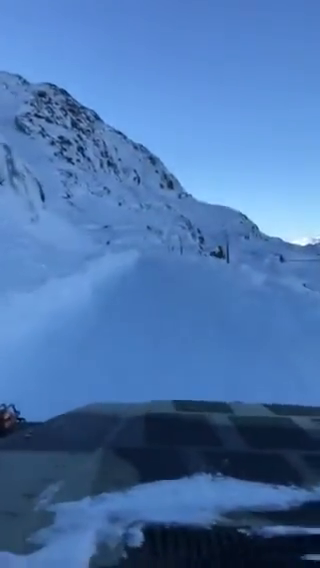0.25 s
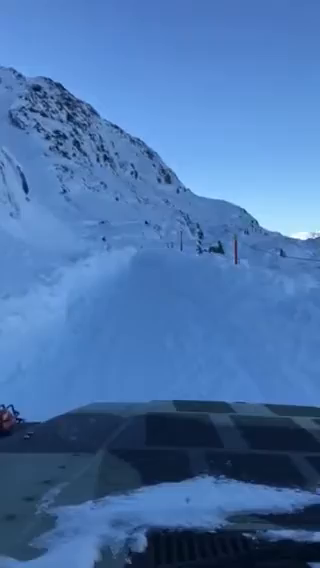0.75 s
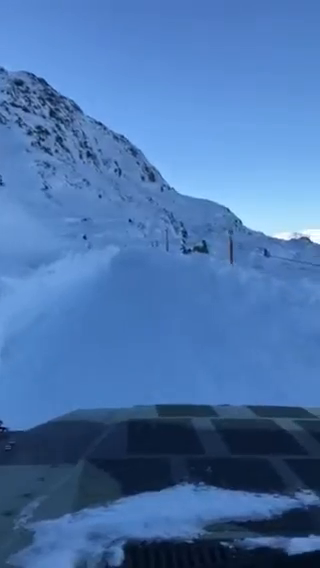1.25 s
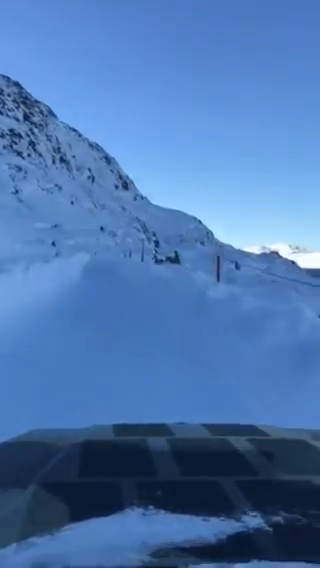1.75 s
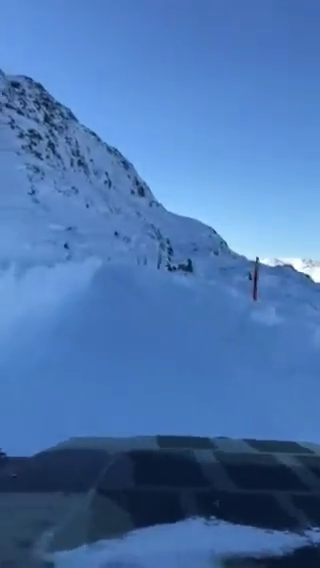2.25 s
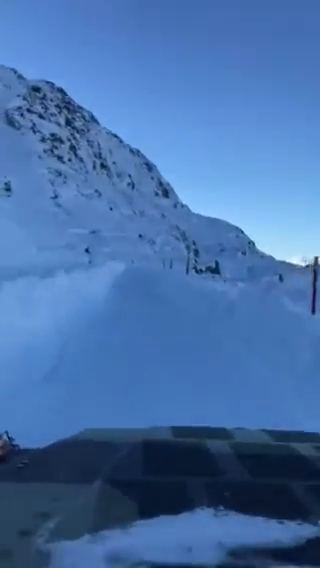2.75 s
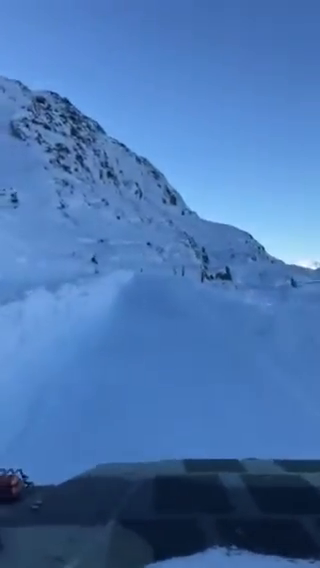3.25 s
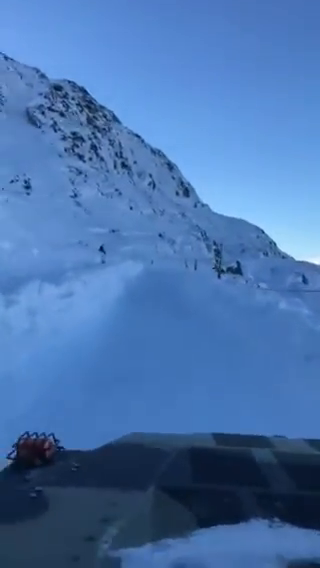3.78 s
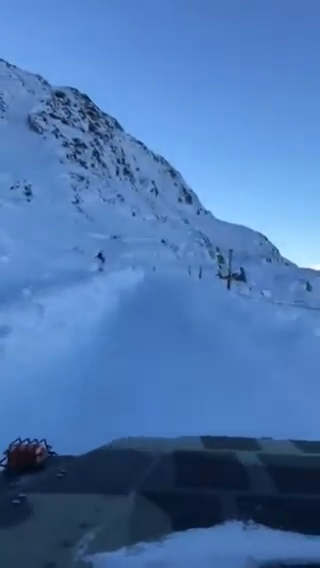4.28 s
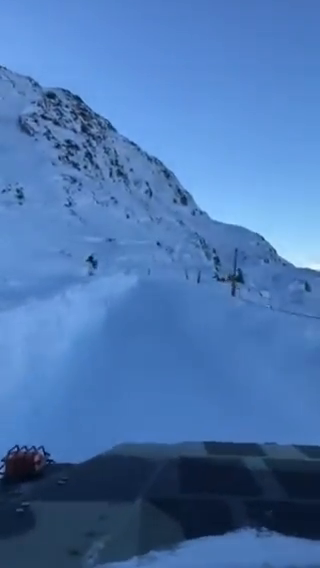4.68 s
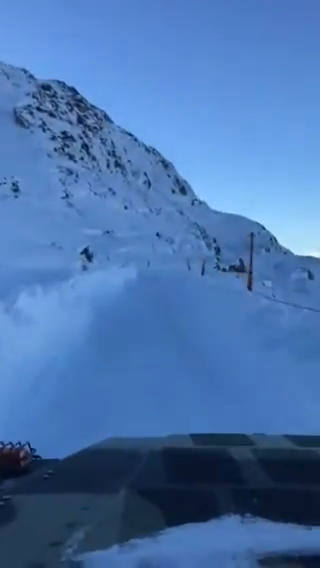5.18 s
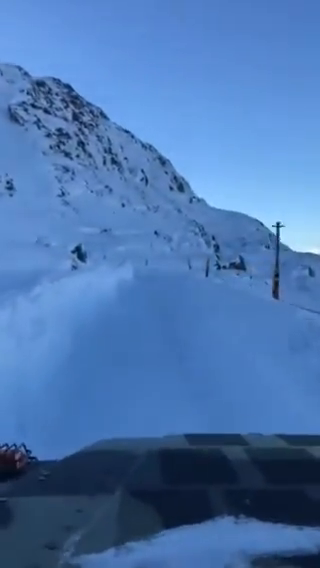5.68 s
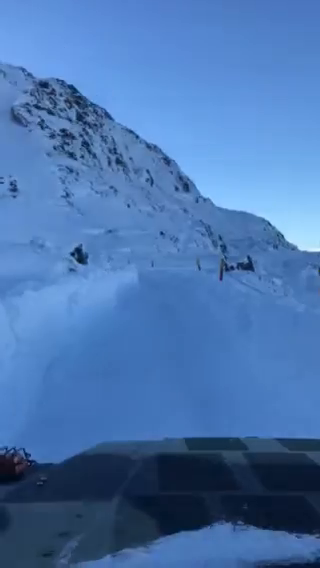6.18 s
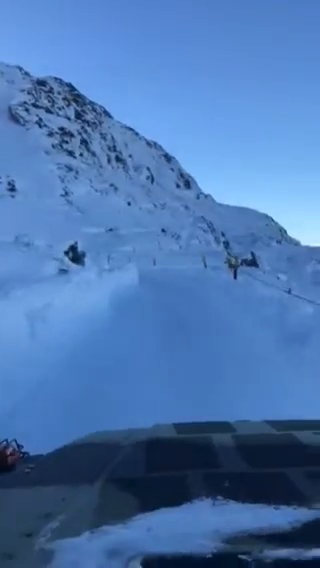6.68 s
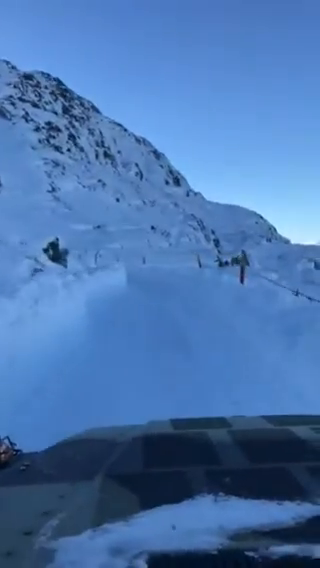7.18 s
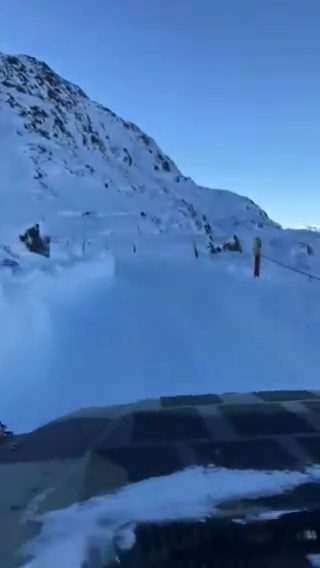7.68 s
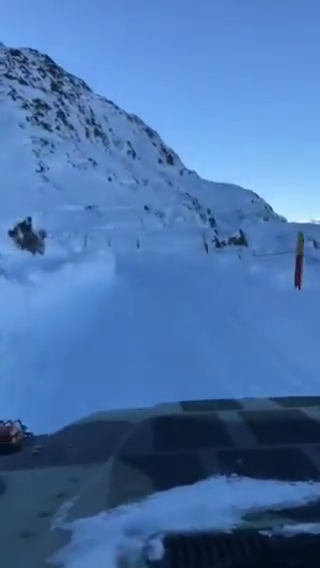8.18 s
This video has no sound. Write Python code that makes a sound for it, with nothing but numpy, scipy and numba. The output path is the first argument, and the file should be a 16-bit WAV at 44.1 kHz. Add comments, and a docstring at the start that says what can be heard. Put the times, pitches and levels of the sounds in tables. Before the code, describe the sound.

Inside a heavy vehicle cab, a deep uneven engine boom and floor thumps roll over crunching snow, with loose metal rattling and brief squeaks.

```python
"""Inside the cab of a heavy vehicle crawling over deep snow on chained wheels, for some eight seconds.
Throughout, uneven firings and bumps resonate as boom, floor modes drum, and snow noise crunches and hisses.
A bracket squeaks in stick-slip harmonics at once; modal clatter is densest up to about 3 s, with two-mode clinks.
Near 2.3 s it squeaks again and a sliding tone squeals; sparser knocks follow, with one more squeak at 4.5 s.
Three squeals fall around 8 to 8.2 s; the boom swells strongest near 8.3 s, dips and briefly returns."""
import sys
import numpy as np
from scipy import signal
from scipy.fft import rfft, irfft
from scipy.io import wavfile
from scipy.ndimage import uniform_filter1d
from numba import njit

SR = 44100
rng = np.random.default_rng(int(sys.argv[2]) if len(sys.argv) > 2 else 0)


def inscribe(sig):
    """Save sig as 16-bit PCM at rate SR to the path in sys.argv[1].

    A 1-D sig is mono; a 2-D sig holds one channel per row.
    Samples are clipped to [-1, 1] before scaling.
    """
    pcm = np.round(np.clip(np.atleast_2d(sig).T, -1, 1) * 32767)
    wavfile.write(sys.argv[1], SR, pcm.astype(np.int16))


N = 371763

# boom of the cab air, before its random waver: start_s, level_db
BOOM_LEVEL = [(0.0, -26), (0.09, -14), (0.19, -34), (0.23, -18.5), (0.63, -22), (0.98, -18.5), (1.08, -50),
              (1.15, -19), (1.36, -17), (1.38, -20), (1.48, -17), (1.95, -14.5), (2.02, -27), (2.04, -45),
              (2.09, -21.5), (2.37, -16.5), (2.46, -25), (2.63, -18.5), (2.67, -34), (2.82, -14.5),
              (2.96, -36), (2.98, -16.5), (3.12, -16), (3.15, -32), (3.4, -21), (3.43, -19), (3.57, -16),
              (3.59, -45), (3.85, -13), (4.01, -26), (4.06, -21), (4.15, -27), (4.51, -26), (4.58, -15.5),
              (4.65, -20.5), (5.56, -19), (5.61, -28), (5.8, -30), (5.99, -12.5), (6.03, -30), (6.1, -24),
              (6.13, -25.5), (6.32, -20.5), (6.62, -16), (6.69, -27), (6.78, -15), (6.86, -35),
              (6.9, -17.5), (7.16, -21), (7.21, -40), (7.25, -18), (7.58, -19.5), (7.65, -36),
              (7.82, -15.5), (7.96, -23), (8.1, -12.5), (8.17, -38), (8.29, -9.5), (8.36, -27),
              (8.43, -14.5)]
# centre of the cab resonance and mean firing rate: start_s, pitch_hz
BOOM_TUNING = [(0.0, 49.02), (0.98, 48.4), (1.2, 55.88), (1.55, 46.62), (1.76, 55.7), (2.02, 47.05),
               (2.32, 45.74), (2.44, 57.35), (2.89, 60.1), (3.59, 50.68), (4.84, 47.26), (5.35, 50),
               (6.55, 46.77), (6.9, 55.44), (7.18, 48.82), (8.43, 47.4)]
BOOM_WAVER_DB = -0.1  # rms of the slight random swell
# steady low shaking of the frame: frequency_hz, density_db (per Hz)
SWAY_SHAPE = [(16, -0.5), (25, -13.5), (33, -4), (40, 2.5), (70, 0.5)]
SWAY_DB = -25
# wheel bumps: start_s, floor_peak_db, body_rms_db
WHEEL_BUMPS = [(0.252, -18, -30), (0.463, -20, -30), (0.815, -14, -29), (0.909, -19.5, -57),
               (1.099, -38, -29), (1.431, -11.5, -26), (1.625, -14.5, -30.5), (1.897, -23, -24.5),
               (2.372, -30, -32), (2.573, -28, -38), (2.777, -26, -25), (3.04, -17, -28.5),
               (3.35, -10, -46), (3.637, -18, -37), (3.829, -36, -30), (3.912, -14.5, -55),
               (4.235, -16.5, -30.5), (4.421, -8.5, -54), (4.781, -14.5, -47), (5.068, -9.5, -31),
               (5.2, -12.5, -28.5), (5.349, -22, -49), (5.601, -15.5, -50), (6.036, -14.5, -35),
               (6.255, -31, -28.5), (6.809, -39, -28.5), (6.913, -35, -41), (7.07, -12, -36),
               (7.527, -11.5, -35), (7.831, -24, -49), (7.997, -32, -30.5), (8.37, -12, -36)]
THUMP_RISE_S, THUMP_T60_S = 0.008, 0.7
# resonances of the floor panels: frequency_hz, width_hz, weight_db
PANEL_MODES = [(90.4, 30, -0.5), (107.6, 31, 2), (130.9, 25.8, -3)]
DRUM_DB, DRUM_PER_CRUNCH_DB = -27.5, 0.84  # level at the usual crunch; dB gained per dB of crunch
# rumble of the body: frequency_hz, density_db (per Hz)
RUMBLE_SHAPE = [(25, 6), (70, -6.5), (140, 2.5), (190, -4), (270, -4.5), (400, -15.5), (600, -19.5),
                (900, -30)]
RUMBLE_DB, RUMBLE_PER_CRUNCH_DB = -32, 0.05  # likewise
# load of snow under the wheels: start_s, crunch_db, hiss_db
SNOW_LOAD = [(0, -47, -52.5), (.37, -43, -45.5), (.65, -45.5, -53.5), (.91, -41, -46.5),
             (1.2, -43.5, -51.5), (1.55, -41.5, -45.5), (1.9, -47, -49.5), (2.6, -43.5, -49.5),
             (2.96, -41, -48.5), (3.22, -49.5, -54), (3.5, -44.5, -48), (3.93, -39.5, -46.5),
             (4.12, -48.5, -54), (4.46, -39, -46), (4.75, -44, -47.5), (5.23, -40, -51), (5.42, -43, -49.5),
             (5.53, -45, -59.5), (5.65, -43, -51.5), (5.75, -48, -59), (5.88, -41.5, -56), (6.06, -42, -49),
             (6.6, -46.5, -53), (6.9, -41, -51), (7.17, -42.5, -50.5), (7.27, -41, -46.5),
             (7.4, -44.5, -55.5), (7.56, -41.5, -48.5), (7.7, -48.5, -53.5), (7.85, -42.5, -48.5),
             (8.1, -42, -48.5), (8.2, -46, -51), (8.43, -42, -47)]
USUAL_CRUNCH_DB = -43
# coarse breaking of snow: frequency_hz, density_db (per Hz)
CRUNCH_SHAPE = [(400, 13.5), (700, -0.5), (1000, 4.5), (1400, 2), (2000, -9.5), (3000, -36), (4500, -29)]
# fine breaking of snow: frequency_hz, density_db (per Hz)
HISS_SHAPE = [(2000, 5), (3300, -1), (4600, -3), (6500, -7.5), (8000, -10), (10400, -13.5), (12000, -13),
              (15500, -15)]
LUMPS_DB, PINGS_DB = -6, -11  # relative to the crunch
# knocks of loose gear, levels before fixed offsets:
# start_s, peak_db, thud_db (re peak), sizzle_db (re peak), strongest_ring_hz, scrape_s
KNOCKS = [(0.072, -35.5, -20, 0, 8800, 0.02), (0.232, -28.5, 4, -8, 3550, 0.012),
          (0.276, -22.5, -1.5, -29, 3660, 0.004), (0.288, -26, -3, -29, 4430, 0.0057),
          (0.305, -18, -18, -10, 7500, 0.0016), (0.341, -37, 10, -25, 2400, 0.006),
          (0.504, -24.5, 2.5, -14, 2380, 0.019), (0.5805, -33, 6, -22, 3280, 0.0035),
          (0.765, -21.5, -10, -26, 4460, 0.0021), (0.993, -46, 16, -23, 2370, 0.0059),
          (1.089, -17.5, -1, -31, 4030, 0.00089), (1.17, -20, -6.5, -11, 4420, 0.02),
          (1.28, -24.5, -25, -30, 6100, 0.0043), (1.459, -22, -1.5, -9, 6300, 0.021),
          (1.566, -13.5, -2, -20, 3300, 0.004), (1.584, -34, 3, -22, 2050, .005),
          (1.6096, -9.5, -11, -11, 5100, 0.0028), (1.611, -26.5, 2, -22, 2170, .008),
          (1.673, -21, -5, -8, 6600, 0.012), (1.727, -11.5, -10, -13, 2320, 0.008),
          (1.739, -21, -9, -9, 3700, 0.01), (1.858, -22.5, 4.5, -19, 2860, 0.011),
          (1.905, -26, 7.5, -27, 2700, 0.0093), (1.98, -41, -15, -25, 4000, .002),
          (1.998, -32, 4, -25, 2500, 0.0071), (2.0018, -16.5, -13, -17, 5300, 0.012),
          (2.022, -24.5, -14, -12, 5600, 0.013), (2.083, -40, 10, -22, 1700, 0.0041),
          (2.223, -43, 16, -20, 2480, 0.0036), (2.2845, -30.5, 5, -29, 3442, 0.012),
          (2.5, -54, 2, -22, 3450, 0.0053), (2.578, -29, -10, -7, 3480, 0.0044),
          (2.729, -29, 1, -8, 3150, 0.0092), (2.7735, -14.5, -7.5, -9, 7040, 0.0079),
          (2.783, -13.5, -12, -8, 3830, 0.011), (2.808, -16, -11, -11, 3880, 0.017),
          (2.829, -27, -8, -12, 4370, 0.0067), (2.863, -20.5, -14, -13, 6400, 0.012),
          (2.875, -21.5, -19, -15, 3160, 0.017), (2.914, -36, 4, -22, 1597, 0.013),
          (2.93, -21, -5, -26, 4270, 0.021), (2.965, -21.5, -2, -27, 4370, 0.011),
          (3.03, -26, 8, -23, 3710, 0.0027), (3.047, -42, 6, -25, 2000, 0.0059),
          (3.0615, -29, -11, -23, 4530, 0.0035), (3.069, -29, 5.5, -20, 3200, 0.0065),
          (3.101, -28, -3, -3, 8520, .003), (3.273, -35, 9, -26, 2936, 0.015),
          (3.332, -30.5, -1, -14, 2550, 0.02), (3.381, -25, -3.5, -9, 2780, 0.0038),
          (3.477, -27, -14, -25, 3160, 0.0043), (3.5813, -25, -27, -8, 4495, 0.018),
          (3.6673, -30.5, 5, -15, 3830, 0.003), (3.781, -21.5, 1.5, -29, 3960, 0.0012),
          (4.291, -50, 13, -25, 2545, 0.023), (4.457, -30.5, 9.5, -8, 3540, 0.0026),
          (4.721, -41, 11, -25, 3000, 0.0063), (4.741, -37, -11, -13, 6300, 0.0059),
          (4.882, -39.5, 14.5, -25, 2600, 0.0097), (5.099, -32.5, 2, -27, 3350, 0.0068),
          (5.127, -42.5, 18, -25, 2300, 0.0081), (5.175, -30, 3, -22, 3400, .005),
          (5.223, -28, 1, -8, 3610, 0.005), (5.26, -33, 0, -24, 3620, .004),
          (5.301, -31, -2, -23, 3130, 0.0063), (5.3977, -44, 17.5, -24, 2506, 0.0057),
          (5.498, -42, -12, -26, 3980, 0.0053), (5.6464, -45, 5, -24, 2730, .007),
          (5.8757, -43, 17, -22, 2570, 0.0046), (6.004, -38.5, 8, -22, 2390, 0.025),
          (6.196, -25.5, -26, -10, 2640, 0.0059), (6.41, -31.5, -2, -5.5, 2500, 0.007),
          (6.5293, -31, -3, -22, 2712, 0.0059), (6.602, -35, -13, 2, 2530, 0.0058),
          (6.65, -53, -14, -24, 5380, 0.006), (6.826, -38, 1, -6, 2766, 0.056),
          (6.953, -32, 1, -14, 3820, .012), (7.027, -29, 5, -5, 3830, 0.0054),
          (7.487, -46, 16.5, -23, 2309, 0.008), (7.544, -35, 1, -26, 3200, 0.0075),
          (7.794, -31, -5, -26, 4126, 0.005), (7.903, -53, 5, -26, 2300, 0.0068),
          (7.9937, -27, -4, -9, 3013, 0.0025), (8.08, -29, -14, -11, 2514, 0.0082),
          (8.1673, -37, -14, -5, 2657, 0.0052), (8.23, -40, 12, -26, 2204, .006),
          (8.398, -29.5, 2, -20, 4633, 0.011)]
# modes of the loose gear, before detuning: frequency_hz, width_hz
METAL_MODES = [(1200, 150), (1500, 120), (2150, 200), (3300, 200), (3860, 350), (4450, 150), (5100, 250),
               (5800, 150), (6100, 120), (6500, 110), (7100, 120), (8800, 200), (11800, 2000),
               (14000, 1500)]
CLATTER_T60_S, T60_PER_SCRAPE = 0.045, 4.3  # a long scrape also dies more slowly
GEAR_RING = 0.42  # share of modal ringing in a knock
FAINT_DB, FAINT_SPREAD_DB, FAINT_SCRAPE_S = -44, 3, 0.008  # faint knocks at random moments
# contacts of chain links: start_s, peak_db, link (row of LINK_TONES)
LINK_HITS = [(.0149, -44, 2), (.307, -40, 6), (.3995, -47, 0), (.5013, -44, 1), (.9951, -50, 0),
             (1.439, -46, 0), (1.666, -36, 3), (1.678, -30, 3), (1.7594, -48, 1), (1.949, -47, 1),
             (2.1854, -44.5, 2), (2.2937, -51, 2), (2.3281, -38, 1), (2.5466, -40, 2), (2.6359, -50, 0),
             (2.6843, -44, 1), (3.1053, -54, 0), (4.293, -42, 5), (4.328, -48, 0), (4.369, -44, 1),
             (4.866, -49, 0), (4.872, -47, 1), (4.882, -43, 5), (5.4286, -45, 1), (5.652, -45, 4),
             (5.8546, -46, 0), (5.877, -48, 1), (6.19, -45, 4), (6.3031, -47, 0), (6.331, -49, 1),
             (6.8638, -49, 1), (7.0554, -50, 0), (6.666, -52, 0), (7.078, -50, 1), (7.9478, -49, 0),
             (7.9603, -51, 1)]
# two modes of each link: main_hz, partner_hz, partner_db (re main)
LINK_TONES = [(5340, 3520, -2.5), (4550, 3170, -1), (6570, 2800, -13), (7180, 6100, -18), (2720, 2900, -17),
              (1470, 1300, -8), (7400, 11600, 1)]
CLINK_T60_S, CLINK_RISE_S = 0.1, 0.002
CLINK_WOBBLE_RAD, CLINK_TICK = 0.13, 0.35  # phase step as links grind; share of tick as they touch
# bracket squeaks: start_s, slip_rate_hz, length_s, level_db, overtones_db (added to all but the fundamental)
STICK_SLIPS = [(0.046, 989, 0.015, -32, -13), (0.097, 1045, 0.012, -42, -6), (2.32, 1053, 0.032, -35, -9),
               (2.3747, 933, 0.018, -21.5, -9), (4.533, 989, 0.013, -31.5, -8)]
# weight of each harmonic of the slip rate: weight_db
HARMONIC_WEIGHTS = [-11, 5.5, -6.5, -16, -33, -24, -18]
# squeals of rubbing parts: start_s, starting_pitch_hz, level_db
RUBS = [(2.283, 3750, -39), (7.99, 3205, -43), (8.08, 2950, -43), (8.163, 2850, -48)]
SQUEAL_S, SQUEAL_FALL = 0.022, 0.12  # length; share of pitch lost
# steady fan and wind hiss: frequency_hz, density_db (per Hz)
AIR_SHAPE = [(880, -26), (1500, -40), (3250, -35), (4080, -0.5), (4780, -13), (6690, -10), (16000, -18)]
AIR_DB = -61
TOP_HZ, DRIVE = 15950, 1.7  # cut-off; how hard peaks are rounded


def undb(db):
    """Logarithmic level: decibels to amplitude gain."""
    return 10 ** (np.asarray(db) / 20)


def unit(x):
    """Normalisation: scale to rms 1."""
    return x / np.sqrt(np.mean(x ** 2))


def noise():
    """White noise: equal power at all frequencies, over the whole scene."""
    return rng.standard_normal(N)


def held_noise(count, hold):
    """Sample-and-hold: random values, each kept for hold samples."""
    return rng.standard_normal(count // hold + 1).repeat(hold)[:count]


def curves(table):
    """Linear interpolation: every column after the time, sample by sample."""
    s, *columns = np.transpose(table)
    return [np.interp(np.arange(N) / SR, s, c) for c in columns]


def add(out, s, x):
    """Superposition: mix x into out from time s."""
    i = int(s * SR)
    out[i:i + len(x)] += x[:N - i]


@njit
def svf(x, hz, width):
    """Second-order resonance: a state-variable band-pass with movable centre and gain 1 there."""
    y, b, l = np.empty(len(x)), 0., 0.
    for i in range(len(x)):
        g, k = np.tan(np.pi * hz[i] / SR), width / hz[i]
        v = (b + g * (x[i] - l)) / (1 + g * (g + k))
        b, l, y[i] = 2 * v - b, l + 2 * g * v, k * v
    return y


def band(x, hz, width_hz):
    """Cascaded resonance: the same band-pass twice, for steep skirts."""
    centre = np.full(len(x), 1.) * hz
    once = svf(x, centre, 1. * width_hz)
    return svf(once, centre, 1. * width_hz)


def walk(rate):
    """Slow random modulation: levels held 1 / rate s, slewed twice, at rms 1."""
    k = int(SR / rate)
    steps = np.repeat(rng.standard_normal(N // 200), k)[:N]
    return unit(uniform_filter1d(uniform_filter1d(steps, k), k))


def colour(x, shape):
    """Spectral shaping: interpolate dB over log frequency, falling steeply beyond both ends."""
    hz, db = np.transpose(shape)
    f = np.log(np.arange(1, N // 2 + 2) * SR / N)
    below = np.minimum(f - np.log(hz[0]), 0)
    above = np.minimum(np.log(hz[-1]) - f, 0)
    gain = undb(np.interp(f, np.log(hz), db) + 40 * (below + above))
    return unit(irfft(rfft(x) * gain, N))


def grains(rate, spread_db, tail_s):
    """Shot noise: sudden grains of random size, rate per second, gate noise and decay over tail_s."""
    chance = rng.random((2, N))
    size_db = np.minimum(-spread_db * np.log(1 - chance[1]), 0.79 * spread_db)
    kicks = (chance[0] < rate / SR) * undb(size_db)
    gate = signal.lfilter([1], [1, -np.exp(-1 / (tail_s * SR))], kicks)
    return unit(gate) * noise()


def boom():
    """Driven cavity resonance: uneven firings and wheel bumps ring the cab air near the firing rate."""
    (hz,), (db,) = curves(BOOM_TUNING), curves(BOOM_LEVEL)
    phase = np.cumsum(hz * (1 + 0.0786 * walk(25))) / SR
    firing = undb(0.35 * walk(29)) * np.sin(2 * np.pi * phase)
    bumps = unit(band(noise(), hz, 24.5))
    return undb(db + BOOM_WAVER_DB * walk(18)) * unit(firing + 0.54 * bumps)


def sway():
    """Broadband forced vibration: steady low noise shaped as the shaking of the frame."""
    return undb(SWAY_DB) * colour(noise(), SWAY_SHAPE)


def thumps():
    """Impulsive excitation: gains of floor thump and body jolt rise quickly, then decay exponentially."""
    floor, body, t = np.zeros(N), np.zeros(N), np.arange(SR // 2) / SR
    fade = (1 - np.exp(-t / THUMP_RISE_S)) * undb(-60 * t / THUMP_T60_S)
    fade /= fade.max()
    for s, thump_db, jolt_db in WHEEL_BUMPS:
        add(floor, s, undb(thump_db) * 0.5 * fade)  # a noisy thump peaks at about twice its rms
        add(body, s, undb(jolt_db) * fade)
    return floor, body


def floor_drumming(deeper_db, thump):
    """Modal vibration: one bump noise drives the panel modes, with alternating sign."""
    bumps, drum = noise(), np.zeros(N)
    for k, (hz, width_hz, db) in enumerate(PANEL_MODES):
        drum += (-1) ** k * undb(db) * band(bumps, hz, width_hz)
    gain = np.hypot(undb(DRUM_DB + DRUM_PER_CRUNCH_DB * deeper_db), thump)  # powers add
    return gain * unit(drum)


def body_rumble(deeper_db, jolt):
    """Structure-borne noise: a wavering low spectrum grows with snow load and wheel jolts."""
    rumble = colour(noise(), RUMBLE_SHAPE) * undb(2.2 * walk(12))
    return np.hypot(undb(RUMBLE_DB + RUMBLE_PER_CRUNCH_DB * deeper_db), jolt) * rumble


def snow(crunch_db, hiss_db):
    """Granular fracture: steady noise and breaking grains form a coarse crunch and a fine hiss."""
    jolt = undb(1.5 * walk(16))  # lumps of snow shake crunch and hiss together
    breaking = grains(60, 4.5, 0.008)
    coarse = noise() + 0.52 * breaking + 0.5 * grains(40, 1.7, 0.023)
    fine = noise() + 0.69 * breaking + 0.19 * grains(28, 2.7, 0.0042)
    crunch = undb(crunch_db) * colour(jolt * coarse, CRUNCH_SHAPE)
    hiss = undb(hiss_db) * colour(jolt * fine, HISS_SHAPE)
    return crunch + hiss + undb(crunch_db + LUMPS_DB) * lumps()


def lumps(count=520):
    """Discrete fracture: clods break one by one, each a decaying puff of narrow-band noise."""
    out, t = np.zeros(N), np.arange(SR // 16) / SR
    for when, pitch, size, length in rng.random((count, 4)):
        hz, life_s = 750 * 5 ** pitch, 0.004 + 0.009 * length
        puff = unit(svf(rng.standard_normal(len(t)), hz + 0 * t, 0.17 * hz))
        fade = np.minimum(t / 0.0016, 1) * np.exp(-t / life_s)
        add(out, when * N / SR, undb(9.6 * size - 9 * pitch) * fade * puff)
    return unit(out)


def running_gear():
    """Common excitation: the snow load sets snow and ping levels and, with bumps, drumming and rumble."""
    crunch_db, hiss_db = curves(SNOW_LOAD)
    deeper_db = crunch_db - USUAL_CRUNCH_DB
    thump, jolt = thumps()
    drumming = floor_drumming(deeper_db, thump)
    rumble = body_rumble(deeper_db, jolt)
    return drumming + rumble + snow(crunch_db, hiss_db) + undb(crunch_db + PINGS_DB) * pings()


def faint_knocks(count=22):
    """Random impacts: rows with the columns of KNOCKS, at random moments of the scene."""
    rows = rng.random((count, 5))
    return [(when * N / SR, FAINT_DB + FAINT_SPREAD_DB * (2 * size - 1), 16 * thud - 9, 14 * sizzle - 25,
             2400 * 1.6 ** pitch, FAINT_SCRAPE_S) for when, size, thud, sizzle, pitch in rows]


def gear_ring(contacts, high_gain):
    """Modal excitation: a blow wakes the gear's modes to random degrees, none quite in tune."""
    count = len(METAL_MODES)
    woken = undb(-12 * rng.random(count))  # every blow lands elsewhere
    detune = 1 + 0.06 * (2 * rng.random(count) - 1)
    ring = np.zeros(len(contacts))
    for amount, shift, (hz, width_hz) in zip(woken, detune, METAL_MODES):
        if hz > 8000:
            amount = amount * high_gain
        centre = np.full(len(contacts), 1. * shift * hz)
        ring += amount * unit(svf(contacts, centre, 1. * width_hz))
    return ring


def clatter():
    """Multiple impact: bursts of tiny contacts give a thud, a broad rattle, gear modes and a sizzle."""
    out, t = np.zeros(N), np.arange(SR // 6) / SR
    crack = 1 + 2.8 * np.exp(-t / 0.001)  # the first contact is the hardest
    for s, db, thud_db, sizzle_db, ring_hz, scrape_s in KNOCKS + faint_knocks():
        low, contacts, tuned, top = rng.standard_normal((4, len(t)))
        contacts *= 0.5 + rng.exponential(size=len(t))  # contacts of very uneven size
        thud = undb(thud_db + 7.5) * unit(band(low, 1036, 1600))
        rattle = unit(band(contacts, 3070, 4550))
        rattle += 0.9 * unit(band(tuned, ring_hz, 0.16 * ring_hz))
        sizzle = undb(sizzle_db + 2.5) * unit(band(top, 9000, 8900))
        ring = gear_ring(contacts, undb(sizzle_db + 11))  # the highest modes go with the sizzle
        # a long scrape builds up more slowly than a sharp knock
        rise = 1 - np.exp(-t / (0.3 * scrape_s))
        t60_s = max(CLATTER_T60_S + T60_PER_SCRAPE * scrape_s, 0.02)
        decay = undb(-60 * np.maximum(t - 0.61 * scrape_s, 0) / t60_s)
        flutter = undb(2.8 * held_noise(len(t), 90))  # contacts come and go
        knock = thud + crack * (rattle + sizzle) + GEAR_RING * ring
        add(out, s, undb(db - 18.5) * rise * decay * flutter * knock)  # the burst peaks well above its rms
    return out


def clinks():
    """Two-mode free vibration: a link's contact rolls in, grinds its phase and rings down."""
    out, t = np.zeros(N), np.arange(SR // 5) / SR
    fade = (1 - np.exp(-t / CLINK_RISE_S)) * undb(-60 * t / CLINK_T60_S)
    for s, db, link in LINK_HITS:
        main_hz, partner_hz, partner_db = LINK_TONES[round(link)]
        rough = 1 + 0.5 * held_noise(len(t), 90)
        steps = np.cumsum(rng.standard_normal((2, len(t) // 40 + 1)), axis=1)
        wobble = CLINK_WOBBLE_RAD * steps.repeat(40, axis=1)[:, :len(t)]
        main = np.sin(2 * np.pi * main_hz * t + wobble[0])
        partner = undb(partner_db) * np.sin(2 * np.pi * partner_hz * t + wobble[1])
        tick = np.exp(-t / 0.005) * unit(band(rng.standard_normal(len(t)), main_hz, 1500))
        add(out, s, undb(db) * fade / fade.max() * rough * (main + partner + CLINK_TICK * tick))
    return out


def squeaks():
    """Stick-slip friction: harmonics of the slip rate swell and die, with a slightly sharper ring."""
    out, t = np.zeros(N), np.arange(SR // 8) / SR
    for s, hz, length_s, db, over_db in STICK_SLIPS:
        phase = 2 * np.pi * hz * t
        swell = np.sin(np.pi * np.clip(t / length_s, 0, 1))
        rub = swell * undb(1.2 * held_noise(len(t), 100))
        stack = np.zeros(len(t))
        for k, weight_db in enumerate(HARMONIC_WEIGHTS):
            stack += undb(weight_db + over_db * (k > 0)) * np.sin((k + 1) * phase)
        fade = np.minimum(2 * t / length_s, 1) * undb(-60 * t / 0.11)
        ring = 1.5 * fade * np.sin(1.045 * phase)
        add(out, s, undb(db) * (rub * stack + ring))
    return out


def squeals():
    """Friction-driven tone: a roughened tone whose pitch slides smoothly down as the rubbing slows."""
    out, t = np.zeros(N), np.arange(int(SQUEAL_S * SR)) / SR
    for s, hz, db in RUBS:
        phase = 2 * np.pi * hz * (t - SQUEAL_FALL * t ** 2 / (2 * SQUEAL_S))
        rough = 1 + 0.4 * held_noise(len(t), 60)
        add(out, s, undb(db) * np.sin(np.pi * t / SQUEAL_S) * rough * np.sin(phase))
    return out


def pings(count=500):
    """Damped free vibration: small bits of metal and ice tick, each a brief ring of its own pitch."""
    out, t = np.zeros(N), np.arange(SR // 20) / SR
    fade = (1 - np.exp(-t / 0.002)) * undb(-60 * t / 0.045)
    for when, pitch, size in rng.random((count, 3)):
        hz = 500 * 12 ** pitch
        add(out, when * N / SR, undb(13 * size - 17 * pitch) * fade * np.sin(2 * np.pi * hz * t))
    return unit(out)


def air():
    """Turbulence noise: a steady shaped hiss of fan and wind."""
    return undb(AIR_DB) * colour(noise(), AIR_SHAPE)


def cab_echo(near):
    """Reverberation: convolution with exponentially decaying noise, the short damped echo of the cab."""
    t = np.arange(SR // 5) / SR
    cab = rng.standard_normal(len(t)) * undb(-60 * t / 0.079) * (t > 0.002)
    return signal.fftconvolve(near, cab / np.sqrt(np.sum(cab ** 2)))[:N]


def scene():
    """Superposition: all sources add; clatter, clinks and squeals also excite the cab echo."""
    near = clatter() + clinks() + squeals()
    steady = boom() + sway() + running_gear() + air()
    return (steady + squeaks() + near + undb(-5) * cab_echo(near))[None]


def record(dry):
    """Soft saturation and low-pass filtering: loud peaks are rounded and the top is cut."""
    rounded = np.tanh(DRIVE * dry) / DRIVE
    top_cut = signal.ellip(10, 0.2, 80, TOP_HZ, fs=SR, output="sos")
    return signal.sosfilt(top_cut, rounded)


dry = scene()
out = record(dry)
inscribe(out)
```